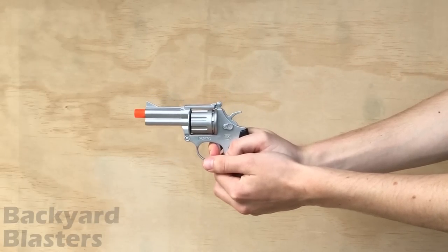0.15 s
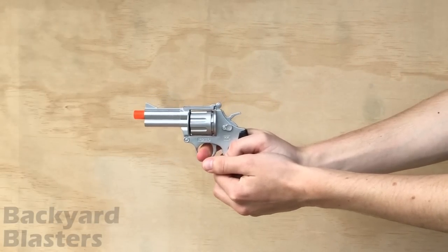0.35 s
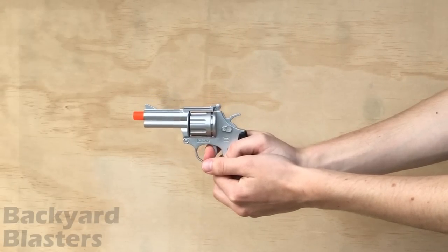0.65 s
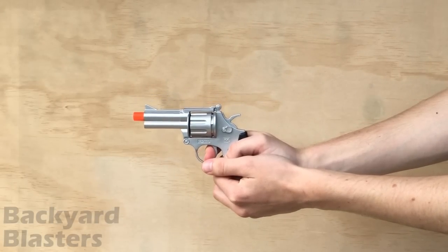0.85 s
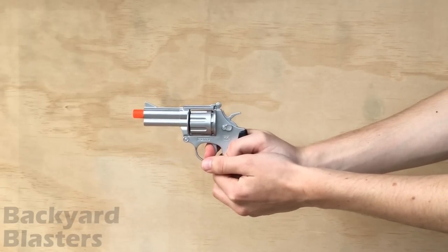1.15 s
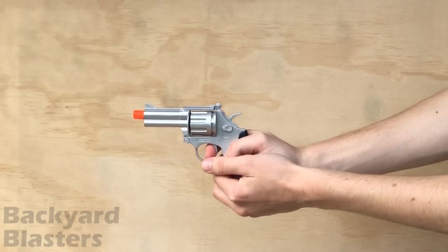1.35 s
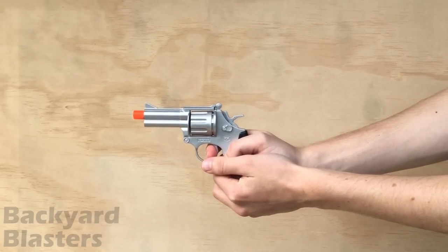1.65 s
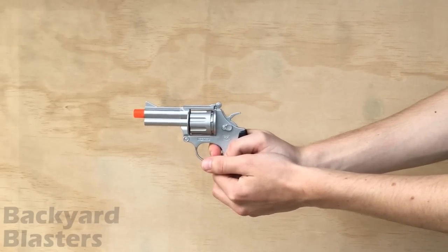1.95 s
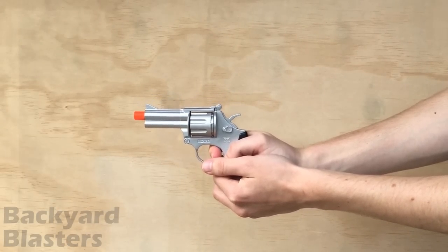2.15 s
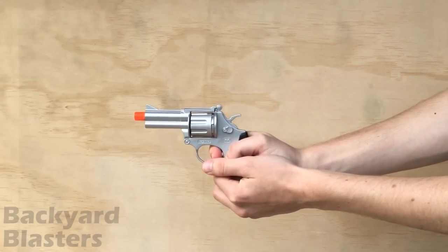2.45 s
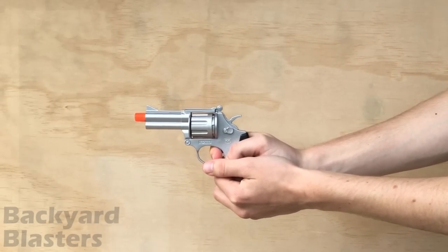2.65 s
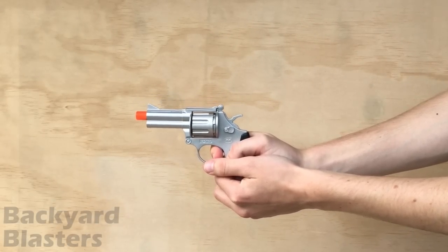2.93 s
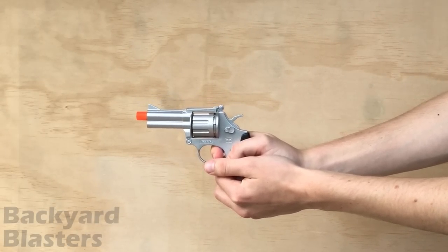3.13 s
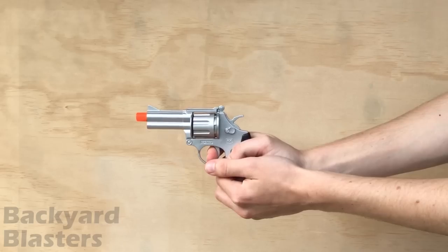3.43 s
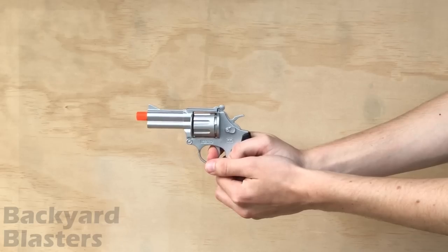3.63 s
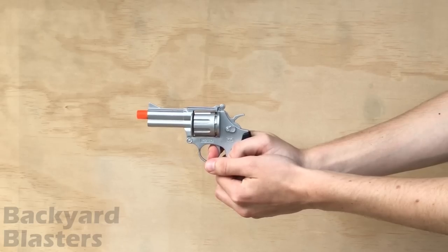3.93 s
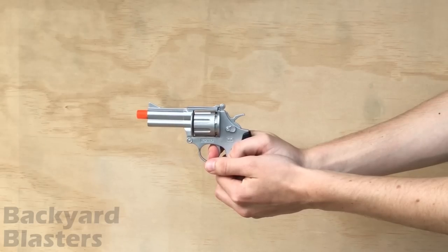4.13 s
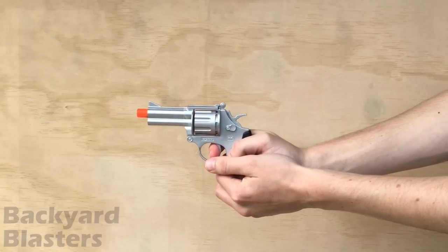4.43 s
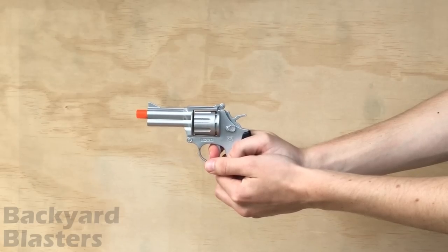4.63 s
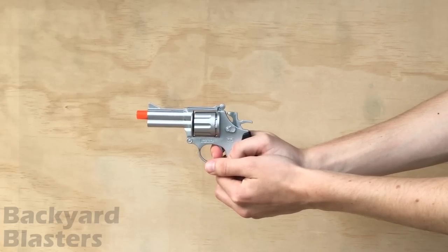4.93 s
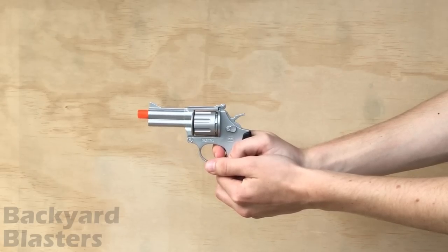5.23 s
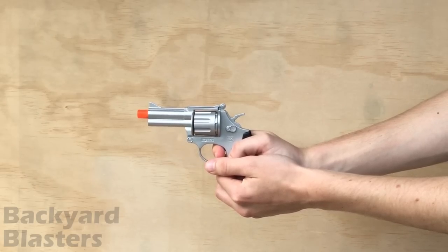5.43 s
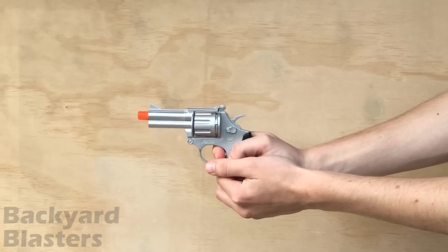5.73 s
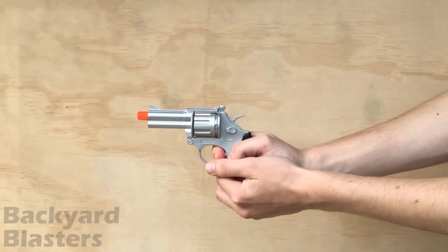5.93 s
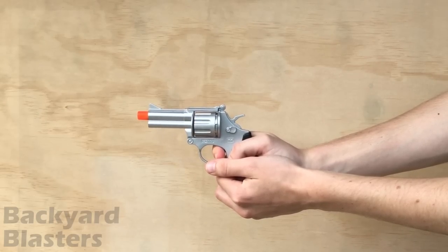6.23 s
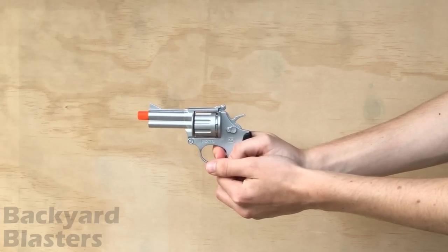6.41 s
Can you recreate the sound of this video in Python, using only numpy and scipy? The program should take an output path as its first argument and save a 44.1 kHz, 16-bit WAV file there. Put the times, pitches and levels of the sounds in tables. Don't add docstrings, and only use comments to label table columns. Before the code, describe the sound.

Bird chirps and far traffic rumble open a quiet outdoor scene, with light metallic trigger ticks very near. A distant motor drones briefly before a sharp, distorted cap bang slaps off a board wall and fades fast. The mechanism clicks again and the hammer knocks without firing; later a latch ticks, the cylinder snaps brightly, and a second bang cracks. Phone gain drops after each shot, then the soft hiss and rumble recover.

```python
import sys
import numpy as np
from scipy import signal
from scipy.fft import rfft, irfft, next_fast_len
from scipy.io import wavfile
from scipy.ndimage import uniform_filter1d

SR = 44100
rng = np.random.default_rng(int(sys.argv[2]) if len(sys.argv) > 2 else 0)


def magnitude_from_level(level_db):
    exponent = np.asarray(level_db, float) / 20
    return 10 ** exponent


def pcm_store(signal):
    levels = np.round(np.clip(np.atleast_2d(signal), -1, 1) * 32767)
    wavfile.write(sys.argv[1], SR, levels.astype(np.int16).T)


N = 289737


def evened(x):
    return x / np.sqrt(np.mean(x ** 2) + 1e-20)


def read(points, at):
    return np.interp(at, *np.transpose(points))


def add(mix, s, sound):
    at = round(s * SR)
    sound = sound[max(-at, 0):]
    part = mix[max(at, 0):][:len(sound)]
    part += sound[:len(part)]


def coloured(count, spectrum):
    hz, db = np.transpose(spectrum)
    size = next_fast_len(count)
    log_hz = np.log(np.fft.rfftfreq(size, 1 / SR) + 1)
    shape = magnitude_from_level(np.interp(log_hz, np.log(hz), db))
    noise = irfft(rfft(rng.standard_normal(size)) * shape, size)
    return evened(noise[:count])


def tint(x, points):
    gain = magnitude_from_level(read(points, np.fft.rfftfreq(len(x), 1 / SR)))
    return evened(irfft(rfft(x) * gain, len(x)))


def band(x, lo_hz, hi_hz, order=3):
    return signal.sosfilt(signal.butter(order, [lo_hz, hi_hz], "band", fs=SR, output="sos"), x)


def slow_wander(count, span):
    noise = rng.standard_normal(count)
    return evened(uniform_filter1d(uniform_filter1d(noise, span), span))


def resonate(x, hz, width):
    turn = np.exp(2j * np.pi * np.cumsum(hz * np.ones(len(x))) / SR)
    r = np.exp(-np.pi * width / SR)
    smooth = signal.lfilter([1 - r], [1, -r], x / turn)
    return 2 * (turn * smooth).real


def traffic(t):
    # f/Hz, level/dB per Hz
    rumble = [(12, -47), (20, -15.5), (29, -11.5), (37, -3.5), (59, 1), (80, 1.5), (103, -6), (203, -21.5),
              (282, -27.5), (348, -28.5), (400, -29.5), (520, -60.5), (880, -120)]
    # t/s, level/dB
    swell = [(0, -46), (1.8, -47.5), (2.55, -45), (2.9, -47.5), (4.6, -45), (5.0, -47.5), (6.15, -48.5),
             (6.3, -46), (6.6, -48)]
    return magnitude_from_level(read(swell, t)) * band(coloured(N, rumble), 35, 900, order=4)


def yard_wash():
    # f/Hz, level/dB per Hz
    yard = [(88, -27.5), (150, 0), (286, -14), (321, -12), (406, -16), (475, -14), (854, -15),
            (2140, -23.5), (2500, -23), (2870, -26), (4000, -26), (4860, -30.5), (8560, -31), (16000, -38)]
    level_db = -59 + .4 * slow_wander(N, 9000)
    return magnitude_from_level(level_db) * band(coloured(N, yard), 190, 17000)


def motor():
    # t/s, drone f/Hz, whine f/Hz, level/dB
    drone_path = [(.95, 473, 490, -78), (1.15, 475, 496, -66), (1.4, 475, 544, -64.5),
                  (1.62, 482, 570, -67), (1.801, 485, 567, -69.5)]
    partials_db = [-21, -3, -9, -10]
    s, *columns = np.transpose(drone_path)
    t = np.arange(s[0], s[-1], 1 / SR)
    hz, whine_hz, db = (np.interp(t, s, c) for c in columns)
    air = rng.standard_normal(len(t))
    drone = 0
    for k, partial_db in enumerate(partials_db, 1):
        drone = drone + magnitude_from_level(partial_db) * evened(resonate(air, k * hz, 20.0 * k))
    whine = evened(resonate(air, whine_hz, 23.0))
    mix = np.zeros(N)
    add(mix, s[0], magnitude_from_level(db) * (drone + whine))
    return mix


def clear_birds():
    # first t/s, count, gap/s, level/dB, first f/Hz
    chirps = [
        (-.018, 5, .1355, -56.5, 1850),
        (.993, 5, .129, -65.5, 2050),
        (1.76, 1, .13, -63, 2050),
    ]
    # t/s, level/dB, first f/Hz, last f/Hz, length/s
    whistles = [(4.045, -63, 4300, 3550, .04), (4.16, -65, 3620, 3420, .06), (4.21, -66, 3350, 3050, .05)]
    top_hz, chirp_s = 2900, 0.03
    rising = [(s + k * gap, db, hz, top_hz, chirp_s) for s, count, gap, db, hz in chirps for k in range(count)]
    mix = np.zeros(N)
    for s, db, first_hz, last_hz, length in rising + whistles:
        hz = np.linspace(first_hz, last_hz, round(length * SR))
        tone = np.sin(2 * np.pi * np.cumsum(hz) / SR)
        add(mix, s, magnitude_from_level(db) * np.sqrt(np.hanning(len(hz))) * tone)
    tail = rng.standard_normal(9000) * magnitude_from_level(-60 * np.arange(9000) / SR / .3)
    return mix + magnitude_from_level(-2) * signal.oaconvolve(mix, tail / np.linalg.norm(tail))[:N]


def far_birds():
    # t/s, length/s, f/Hz, width/Hz, level/dB
    trills = [(.55, 0.38, 3730, 700, -73.5), (0, .5, 4050, 300, -77), (.77, 0.044, 5140, 200, -71),
              (2.7, 1.73, 3260, 1300, -73.5), (2.95, 0.46, 3930, 400, -77), (2.98, 0.14, 3770, 60, -74),
              (3.38, .07, 4900, 30, -66), (3.55, 0.22, 3550, 1000, -69.5), (3.8, 0.5, 3980, 150, -78),
              (3.87, .04, 3150, 130, -70), (3.94, 0.25, 3046, 30, -71), (4.2, .17, 3190, 170, -74),
              (4.3, 0.12, 3700, 200, -74), (4.63, 0.33, 4050, 150, -76), (6.17, 0.33, 3640, 200, -75),
              (6.33, 0.22, 3990, 210, -66.5)]
    flutter_hz, flutter_db = 18, -0.5
    mix = np.zeros(N)
    for s, length, hz, width, db in trills:
        t = np.arange(round(length * SR)) / SR
        air = rng.standard_normal(len(t))
        fuzz = evened(resonate(resonate(air, hz, width), hz, width))
        level = magnitude_from_level(db + flutter_db * np.sin(2 * np.pi * flutter_hz * t))
        add(mix, s, level * fuzz * signal.windows.tukey(len(t), .3))
    return mix


def gain_control(t):
    # shot t/s, dive/dB, creep/dB per s, full again t/s
    ducks = [
        (1.88, -21.5, 23.5, 2.552),
        (5.35, -17.5, 15.5, 5.93),
    ]
    dive_s, snap_s = 0.04, .12
    duck_db = np.zeros(len(t))
    for s, dive_db, creep_db, back in ducks:
        crept_db = dive_db + creep_db * (back - snap_s - s - dive_s)
        duck_db += np.interp(t, [s, s + dive_s, back - snap_s, back], [0, dive_db, crept_db, 0])
    return duck_db


def loud_mode_hiss(t, duck_db):
    # f/Hz, level/dB per Hz
    loud_hiss = [(120, -43.5), (200, -5.5), (240, -7), (722, -15), (806, -12.5), (2290, -18), (11300, -24),
                 (16000, -30.5)]
    # on t/s, off t/s, level/dB
    loud_mode = [
        (1.9, 2.509, -54.5),
        (5.371, 6.138, -55.5),
    ]
    hiss = coloured(N, loud_hiss)
    mix = np.zeros(N)
    for on, off, db in loud_mode:
        switch = np.interp(t, [on, on + .01, off - .004, off], [0, 1, 1, 0])
        mix += magnitude_from_level(db + 0.86 * duck_db) * hiss * switch
    return mix


def background():
    t = np.arange(N) / SR
    duck_db = gain_control(t)
    yard = traffic(t) + yard_wash() + clear_birds() + far_birds() + motor()
    return loud_mode_hiss(t, duck_db) + magnitude_from_level(duck_db) * yard


def click(db, hz, middle_db, top_db, body_db):
    # f/Hz, 60 dB decay/s, level/dB
    middle_rings = [(5600, .01, 10), (6790, .01, 5), (8220, 0.028, 8.5), (9700, .012, 6)]
    # f/Hz, 60 dB decay/s, level/dB
    top_rings = [(11700, 0.015, 4.5), (14700, .014, 15)]
    t = np.arange(6000) / SR
    rattle, hiss = rng.standard_normal((2, len(t)))
    rattle = rattle * (1 - np.exp(-t / 0.00075)) * np.exp(-t / 0.0013)
    hiss = hiss * magnitude_from_level(-60 * t / 0.15) * np.minimum(t / .004, 1)

    luck, detune = rng.standard_normal((2, 6))
    modes = [(hz, .01, 3.0), (1400, .02, body_db + 15.5)]
    for (f, t60, d), u, v in zip(middle_rings, luck, detune):
        modes.append((f * (1 + 0.02 * v), t60, d + middle_db + 3.0 * u))
    for (f, t60, d), u in zip(top_rings, luck[4:]):
        modes.append((f, t60, d + top_db + 2.5 * u))
    drive = rattle + magnitude_from_level(-33) * hiss
    ring = sum(magnitude_from_level(d) * evened(resonate(drive, f, 2.9 / t60)) for f, t60, d in modes)

    # f/Hz, level/dB
    colour = np.array([(800, -49.5), (1400, body_db + 4.0), (2300, -1.0), (4200, -3.0),
                       (6000, middle_db + 12.0), (9500, middle_db + 6.0),
                       (12000, .5 * (top_db + middle_db) - 1.0), (14500, top_db + 7.5), (17000, top_db + 9.5)])
    sound = ring + magnitude_from_level(7.0) * tint(rattle, colour)
    echoes = tint(hiss, colour * [1, .6])
    sound = sound / abs(sound).max() + magnitude_from_level(-19.5) * echoes / abs(echoes).max()
    return magnitude_from_level(db - 1.0) * sound * np.minimum((t[-1] - t) / .05, 1) ** 2


def clicks(strikes, middle_db, top_db, body_db):
    mix = np.zeros(N)
    for s, db, hz in strikes:
        add(mix, s, click(db, hz, middle_db, top_db, body_db))
    return mix


def slack():
    # t/s, peak/dB, main ring f/Hz
    strikes = [(.2415, -37, 3180), (.2668, -43, 2340), (.626, -38, 2930), (3.3117, -40.5, 2380),
               (3.3418, -42, 2750)]
    return clicks(strikes, -44, -42, -18)


def latch():
    # t/s, peak/dB, main ring f/Hz
    strikes = [(.3376, -32, 2910), (.3547, -29, 4830), (1.6556, -25.5, 2750), (3.361, -19, 2900),
               (3.3648, -26.5, 3560), (3.3809, -33, 3030), (3.387, -33, 3330), (3.3942, -31.5, 3610),
               (3.5566, -34, 3990), (4.5608, -22.5, 2660)]
    return clicks(strikes, -21.5, -17.5, -38)


def pawl():
    # t/s, peak/dB, main ring f/Hz
    strikes = [(.3617, -28.5, 3090), (.366, -27, 3200), (.5726, -27, 2430), (.5977, -30.5, 2500),
               (.6065, -27, 2920), (.6113, -34, 3040), (1.8082, -25.5, 3530), (1.8313, -13.5, 4400),
               (3.5428, -26, 3380), (3.5713, -28.5, 3520)]
    return clicks(strikes, -8, -25, -21)


def cylinder():
    # t/s, peak/dB, main ring f/Hz
    strikes = [(.3425, -27.5, 2900), (1.851, -25.5, 5000), (1.8554, -27.5, 2760), (1.8625, -22, 2760),
               (1.87, -27, 5000), (3.353, -35, 2800), (3.3783, -29, 2310), (4.9711, -20, 2730),
               (4.9788, -15, 4320), (5.008, -19.5, 5000), (5.0134, -25, 2530)]
    return clicks(strikes, -6, -11, -19)


def trigger():
    # t/s, peak/dB, main ring f/Hz
    strikes = [(.3729, -29.5, 2820), (1.8347, -27, 2400), (3.5844, -39.5, 2810), (4.9942, -33, 2530),
               (5.3353, -24, 3830)]
    return clicks(strikes, -22, -22, -20)


def dud():
    # t/s, peak/dB, main ring f/Hz
    strikes = [(3.4426, -13, 3200)]
    return clicks(strikes, -15.5, -30, -19.5)


def hammer():
    # t/s, peak/dB, main ring f/Hz
    strikes = [
        (1.8808, -18.5, 3140),
        (5.3438, -24, 5000),
        (5.347, -19.5, 3130),
    ]
    return clicks(strikes, -13.5, -23.5, -6.5)


def scrape(length, db):
    count = round(length * SR)
    slips = rng.standard_normal(count) * magnitude_from_level(2.8 * np.minimum(rng.exponential(1, count), 4))
    # f/Hz, 60 dB decay/s, level/dB
    rings = [(1370, .01, -13.5), (2800, .004, -3), (8200, 0.016, -2), (14700, 0.0088, -9)]
    sound = sum(magnitude_from_level(d) * evened(resonate(slips, f, 2.3 / t60)) for f, t60, d in rings)
    return magnitude_from_level(db) * signal.windows.tukey(count, .4) * sound


def spring_scrapes():
    # t/s, length/s, level/dB
    scrapes = [(0.341, .04, -58), (3.361, 0.041, -51), (4.979, .027, -47.5)]
    mix = np.zeros(N)
    for s, length, db in scrapes:
        add(mix, s, scrape(length, db))
    return mix


def mechanism():
    mix = slack() + latch() + pawl() + cylinder() + trigger() + dud() + hammer() + spring_scrapes()
    return band(mix, 1200, 18000, order=6)


def echo(far_db):
    # f/Hz, level/dB per Hz
    echo_colour = [(88, -59.5), (150, -26.5), (376, -19), (689, -9), (790, -9.5), (1020, -1), (1120, -5),
                   (1360, -3), (1500, -3), (3100, -3.5), (4760, -15.5), (8730, -6), (16000, -21)]
    # t after overload/s, level/dB
    echo_level = [(0, -21), (.009, -22.5), (.028, -25), (.063, -29), (.185, -49.5), (.235, -47), (.31, -48),
                  (.43, -58.5), (.6, -66)]
    t = np.arange(0, echo_level[-1][0], 1 / SR)
    deaf_db = -10 * np.exp(-(t / 0.0085) ** 2)
    treble_db = deaf_db + np.maximum(2 - 27 * t, -10.5)
    top_db = deaf_db + np.maximum(-2 - 65.5 * t, -20)
    low_db = -13 + 4 * t + 14 * np.exp(-t / 0.0088)

    spiky = evened(uniform_filter1d(rng.standard_normal(len(t)), 30))
    spikes = magnitude_from_level(3.7 * np.exp(-t / 0.013) * spiky)
    walls = magnitude_from_level(0.94 * slow_wander(len(t), 300) * np.minimum(t / 0.12, 1))
    noise = coloured(len(t), echo_colour) * spikes * walls

    scale = np.std(band(noise, 1500, 4000))
    middle = band(noise, 850, 5160)
    low = magnitude_from_level(low_db + 16.0) * band(noise, 150, 780)
    treble = magnitude_from_level(treble_db - 2.1) * band(noise, 4400, 11440)
    top = magnitude_from_level(top_db + 8.5) * band(noise, 10660, 17000)
    sound = (middle - low - treble + top) / scale
    level = magnitude_from_level(read(echo_level, t) + far_db * np.minimum(t / .2, 1))
    return level * sound * signal.windows.tukey(len(t), .004)


def slap(db):
    u = np.arange(200) / SR / .00007
    return magnitude_from_level(db + 3.5) * rng.choice([-1, 1]) * (1 - u) * np.exp(-u)


def swing(db, first_hz, last_hz, glide, t60):
    t = np.arange(6000) / SR
    hz = last_hz + (first_hz - last_hz) * np.exp(-t / glide)
    level = magnitude_from_level(db - 60 * (t / t60) ** 1.17) * np.minimum(0.55 + t / glide, 1)
    return -level * np.sin(2 * np.pi * np.cumsum(hz) / SR)


def overload(length, db, rings):
    t = np.arange(round((length + 0.0035) * SR)) / SR
    settle = 3000
    drive = rng.standard_normal(len(t) + settle)
    to_go = np.clip(1 - t / (.75 * length), 0, 1)
    ring = magnitude_from_level(-8.5 - 12.0 * to_go) * evened(band(drive, 340, 3500, order=8))[settle:]
    for hz, width, ring_db in rings:
        pure = np.sqrt(2) * np.sin(2 * np.pi * (hz * t + rng.random()))
        fuzzy = evened(resonate(drive, hz, width))[settle:]
        growth_db = 28.0 if hz > 1200 else 12.0
        ring = ring + magnitude_from_level(ring_db - growth_db * to_go) * (pure + .35 * fuzzy)
    fade = np.interp(t, [0, .001, length, length + .005], [0.5, 0.96, 0.39, 0.0])
    ring = band(ring, 150, 3600, order=8) * fade
    treble = magnitude_from_level(-27.5 - 1100 * t) * evened(band(drive, 3200, 16000))[settle:]
    return magnitude_from_level(db) * ring + treble


def shots():
    # fired t/s, overload/dB
    caps = [
        (1.8815, -15),
        (5.3475, -16.5),
    ]
    # f/Hz, width/Hz, level/dB
    dull_rings = [
        [(255, 60, -18), (415, 60, -1), (520, 70, -2), (727, 60, -11), (980, 80, -13), (1970, 200, -12),
         (2710, 80, -6), (3130, 40, 3)],
        [(255, 60, -7), (409, 60, 0), (540, 70, -7), (646, 80, -8), (991, 80, -11), (1430, 150, -16),
         (2540, 60, 4), (3140, 50, 2)],
    ]
    far_echo_db = [-1.2, .9]
    # t after overload/s, peak/dB, first f/Hz, last f/Hz, glide/s
    swings = [
        (-.0185, -15, 1300, 600, .0012),
        (-.002, -17, 330, 220, .006),
        (.0018, -10, 1550, 500, .003),
    ]
    # t/s, peak/dB
    slaps = [(1.9011, -5), (1.9117, -10.5), (1.915, -5), (1.9235, -10), (5.368, -4), (5.371, -8),
             (5.3775, 0), (5.383, -5.5), (5.387, -5)]
    # t/s, peak/dB, f/Hz, 60 dB decay/s
    thumps = [
        (1.9061, -8.5, 55.3, 0.054),
        (5.3745, -7.5, 41, 0.077),
    ]
    overload_s = .019
    mix = np.zeros(N)
    for (s, db), rings, far_db in zip(caps, dull_rings, far_echo_db):
        add(mix, s, overload(overload_s, db, rings))
        add(mix, s + overload_s, echo(far_db))
        for after, swing_db, first_hz, last_hz, glide in swings:
            add(mix, s + overload_s + after, swing(swing_db, first_hz, last_hz, glide, 7.2 * glide))
    for s, db in slaps:
        add(mix, s, slap(db))
    for s, db, hz, t60 in thumps:
        add(mix, s, swing(db, 2.4 * hz, hz, .008, t60))
    return mix


def scene():
    return (background() + mechanism() + shots())[None]


def low_pass(x):
    return signal.sosfilt(signal.butter(12, 17110, fs=SR, output="sos"), x)


def record(dry):
    # f/Hz, width/Hz, share removed
    port_dips = [(10360, 1030, 0.42), (5000, 420, 0.23)]
    heard = dry[0]
    for hz, width, share in port_dips:
        heard = heard - share * resonate(heard, hz, width)
    held = 0.74 * np.tanh(heard / 0.63)
    edge = signal.firwin(401, 15850, window=("kaiser", 7), fs=SR)
    edged = signal.oaconvolve(held, edge, "same")
    leak = magnitude_from_level(-35.5) * (held - edged)
    return low_pass((edged + leak)[None])


dry = scene()
out = record(dry)
pcm_store(out)
```